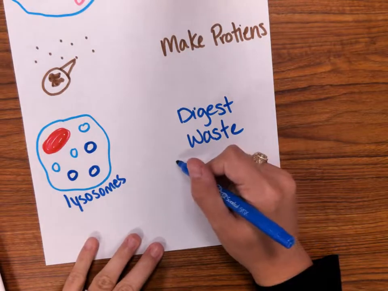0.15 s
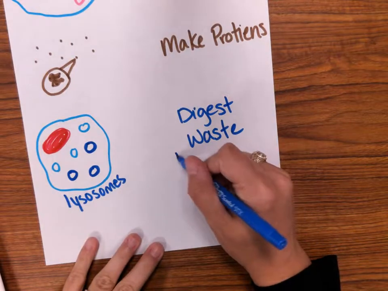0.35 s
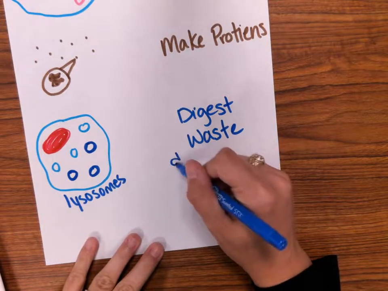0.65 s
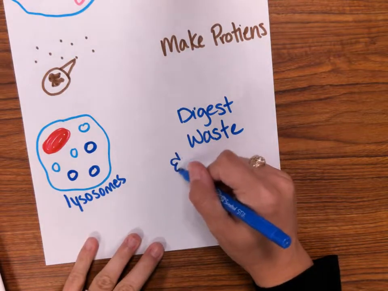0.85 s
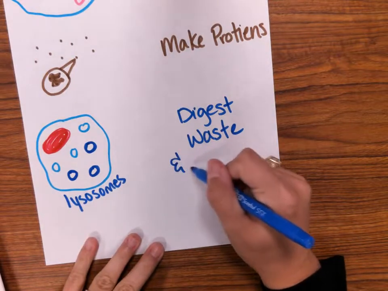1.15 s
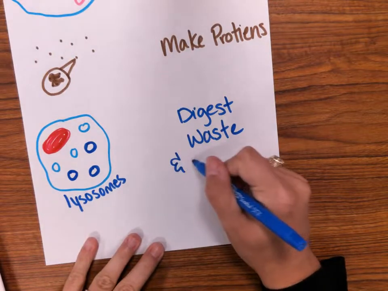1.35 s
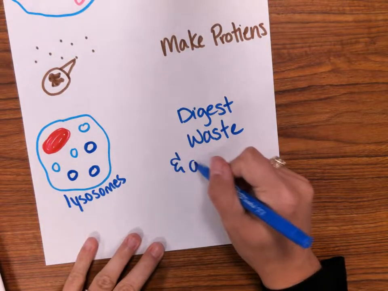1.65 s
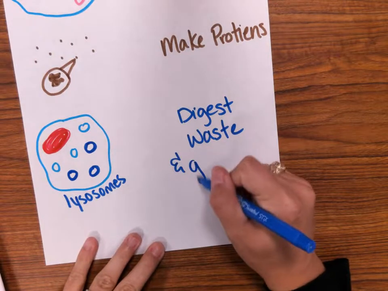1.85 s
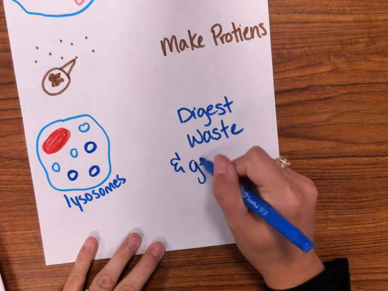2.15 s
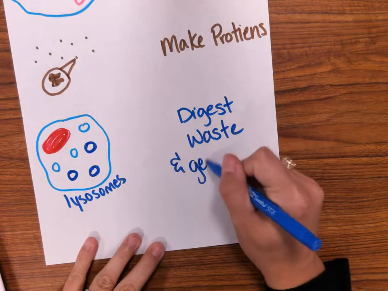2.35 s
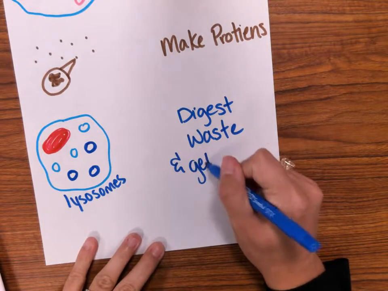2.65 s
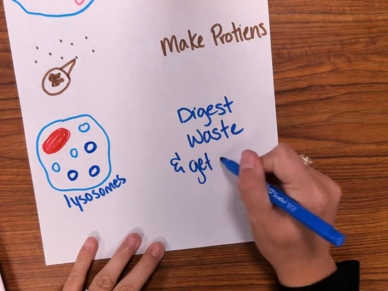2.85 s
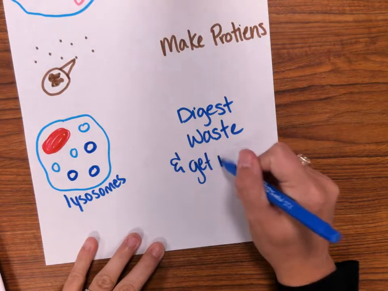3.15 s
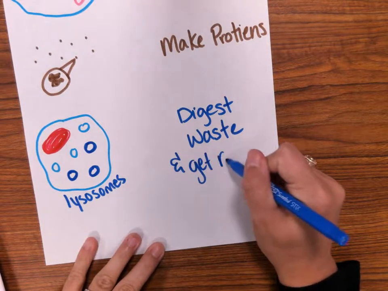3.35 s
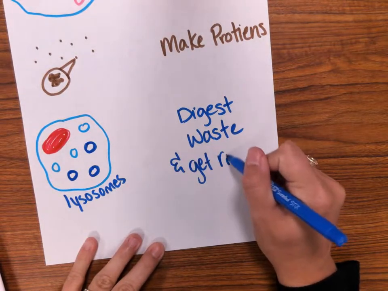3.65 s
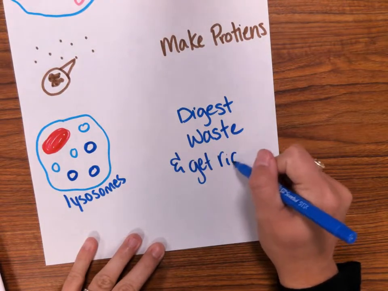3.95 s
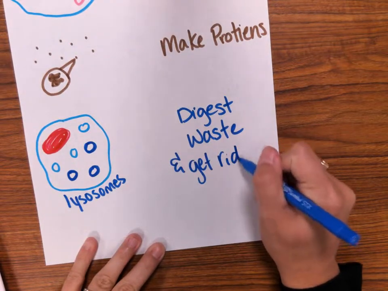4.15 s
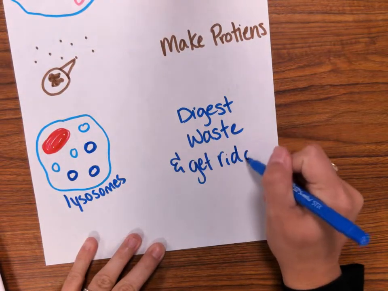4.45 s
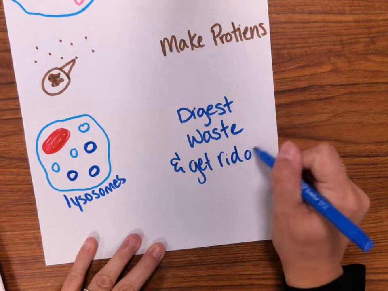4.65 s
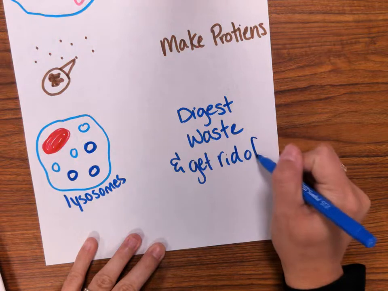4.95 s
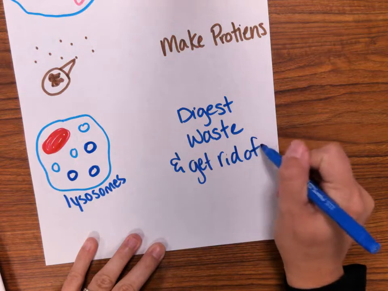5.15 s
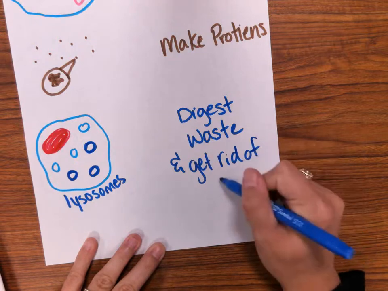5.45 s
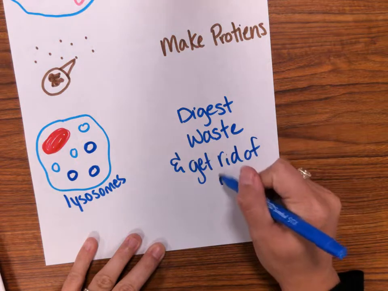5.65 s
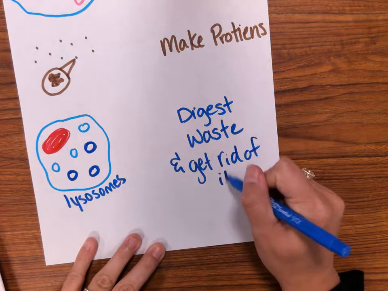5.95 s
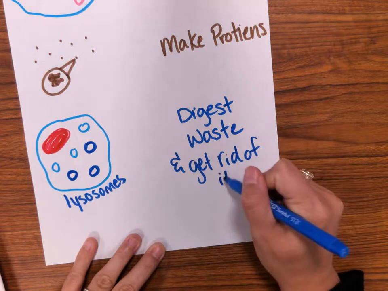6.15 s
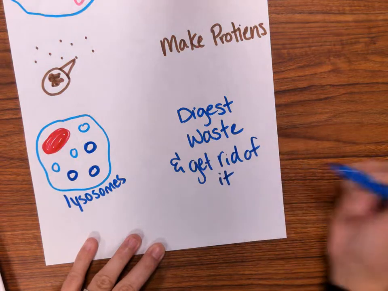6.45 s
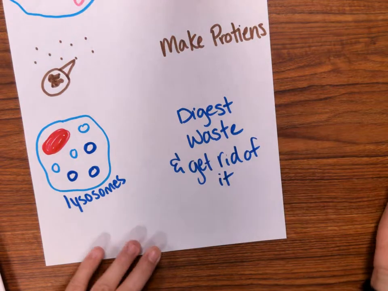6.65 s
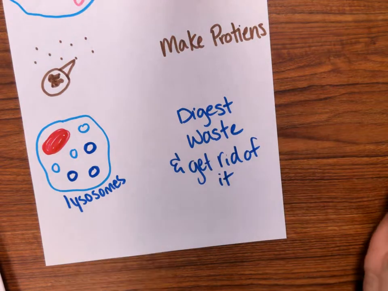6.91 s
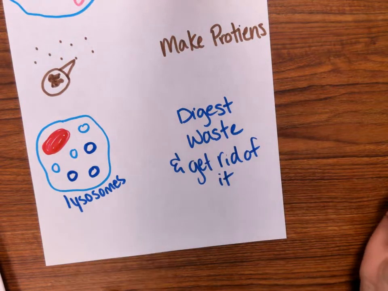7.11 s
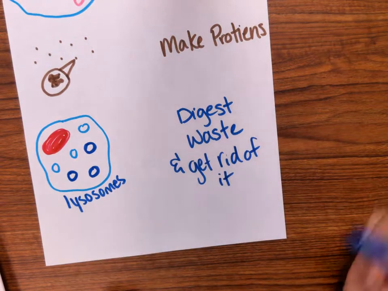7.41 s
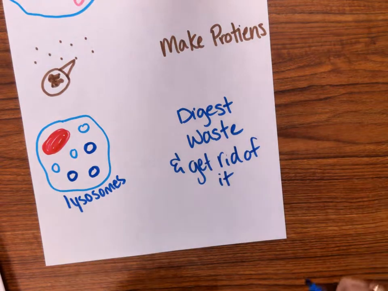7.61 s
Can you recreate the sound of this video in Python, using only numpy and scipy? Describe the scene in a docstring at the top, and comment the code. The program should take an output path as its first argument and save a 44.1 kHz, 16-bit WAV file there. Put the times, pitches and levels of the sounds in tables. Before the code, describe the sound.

A felt-tip marker writes short, squeaky-dry strokes on paper over low ventilation rumble, then one hard knock on the wooden table and plastic clicks.

```python
"""A close microphone at a wooden table, over low ventilation rumble, hum and a faint even hiss.
A felt-tip marker writes a few words on a sheet of paper: fibre snaps hiss, ring the tip and rasp the sheet.
Plastic clicks, slides of the hand and soft thumps come among the strokes.
Near seven seconds the marker knocks once on the table, ringing its modes, and the limiter ducks briefly.
The hand slides on to the end, with a cluster of plastic clicks, the cap's among them; a small room answers."""
import sys
import numpy as np
from scipy import signal
from scipy.fft import rfft, irfft, next_fast_len
from scipy.io import wavfile
from scipy.ndimage import uniform_filter1d, map_coordinates

SR = 44100
rng = np.random.default_rng(int(sys.argv[2]) if len(sys.argv) > 2 else 0)


def file_out(sig):
    """Save sig as 16-bit WAV at sys.argv[1]."""
    # one column per channel
    cols = np.atleast_2d(sig).T
    # limit, then scale
    lim = np.clip(cols, -1, 1)
    pcm = np.round(lim * 32767).astype(np.int16)
    wavfile.write(sys.argv[1], SR, pcm)


N = 342877  # samples, about 7.8 s
EDGE_HZ = 7270  # upper edge of the recorder's band


def gain_of(db):
    """Decibels to amplitude."""
    return 10 ** (np.asarray(db) / 20)


def evened(x):
    """Scales to rms 1."""
    return x / np.sqrt(np.mean(x ** 2) + 1e-20)


def read(points, hz):
    """Reads a table along a log-frequency axis."""
    f, value = np.transpose(points)
    return np.interp(np.log(hz + 1), np.log(f + 1), value)


def add(mix, s, sound):
    """Adds a sound into the mix at time s."""
    part = mix[round(s * SR):][:len(sound)]
    part += sound[:len(part)]


def coloured(x, spectrum):
    """Gives x a spectrum inside the recorder's band, at rms 1."""
    size = next_fast_len(len(x))
    hz = np.fft.rfftfreq(size, 1 / SR)
    shaped = rfft(x, size) * gain_of(read(spectrum, hz)) * (hz < EDGE_HZ)
    return evened(irfft(shaped, size)[:len(x)])


def band(centre_hz, width_hz):
    """Noise around one pitch, half amplitude at width_hz either side, rms 1; centred on zero it is a slow drift."""
    size = next_fast_len(N)
    hz = np.fft.rfftfreq(size, 1 / SR)
    response = 1 / (1 + ((hz - centre_hz) / width_hz) ** 2)
    return evened(irfft(rfft(rng.standard_normal(size)) * response, size)[:N])


def background():
    """Ventilation rumble with a few humming bands, under a faint even hiss."""
    # ventilation rumble: (frequency [Hz], relative level per Hz [dB])
    rumble_spectrum = [(4, 2), (21, 8), (29, -3.5), (33, -7.5), (39, 0), (50, -9), (68, -9), (90, -17.5),
                       (140, -22), (178, -22.5), (230, -25.5), (300, -28.5), (350, -34), (410, -31),
                       (445, -34.5), (540, -36.5), (700, -51.5), (1500, -72.5)]
    # humming bands of the ventilation: (frequency [Hz], half-width at half amplitude [Hz], rms level [dB])
    hum_bands = [(55.84, 4.5, -38), (105.9, 7.6, -46), (145.8, 2.7, -50), (164.5, 9.5, -52.5),
                 (194.4, 1.6, -54.5), (259.7, 4.6, -59.5), (255.7, 2.1, -62), (455.5, 6, -67.5),
                 (486, 5, -71)]
    # even hiss of the room: (frequency [Hz], relative level per Hz [dB])
    hiss_spectrum = [(290, -41), (500, -9.5), (676, -3), (731, -5.5), (883, -8.5), (955, -7.5),
                     (1260, -11.5), (1410, -14.5), (3990, -16.5), (5700, -14.5), (7200, -14)]
    rumble_db, hiss_db = -26.5, -58  # rms
    rumble = gain_of(rumble_db) * coloured(rng.standard_normal(N), rumble_spectrum)
    hum = sum(gain_of(db) * band(hz, width) for hz, width, db in hum_bands)
    hiss = gain_of(hiss_db) * coloured(rng.standard_normal(N), hiss_spectrum)
    return rumble + hum + hiss


def fibres(per_s, spread_db):
    """Tiny snaps of paper fibres at random moments, of uneven size unless spread_db is 0, at rms 1."""
    size = gain_of(spread_db * np.minimum(rng.exponential(1, N), 4))
    sign = rng.choice([-1, 1], N)
    return evened(size * sign * (rng.random(N) < per_s / SR))


def resonant(x, modes):
    """Passes x through parallel resonances with a soft top end, at rms 1."""
    hz = np.fft.rfftfreq(N, 1 / SR)
    response = sum(gain_of(db) / (1 + 2j * (hz - centre) / width) for centre, width, db in modes)
    soft_top = 1 / (1 + (hz / 4500) ** 8)
    return evened(irfft(rfft(x) * response * soft_top, N))


def bent(x, ratio):
    """Shifts every resonance in x by a ratio that may change over time."""
    return map_coordinates(x, [np.cumsum(ratio) % (len(x) - 1)], order=3)


def patchy(x, depth_db=2., span_hz=400., span_s=.04):
    """The colour of a noise shifts a little at random, in patches of frequency and time."""
    window, hop = 1024, 256  # samples
    z = signal.stft(x, SR, nperseg=window, noverlap=window - hop)[2]
    bins, frames = round(span_hz * window / SR), round(span_s * SR / hop)
    patches = uniform_filter1d(rng.standard_normal(z.shape), bins, 0)
    patches = evened(uniform_filter1d(patches, frames, 1))
    varied = signal.istft(z * gain_of(depth_db * patches), SR, nperseg=window, noverlap=window - hop)[1]
    return evened(varied[:N])


def sheet(snaps):
    """A dry rasp, plus the sheet's resonances, which drift and trade strength as the contact travels over it."""
    # resonances of the sheet lying on the table: (frequency [Hz], width [Hz], relative level [dB])
    sheet_modes = [(700, 89, -8), (867, 74, 1), (1100, 230, -3.5), (1277, 33, 5), (1533, 30, 6.5),
                   (1929, 33, 10), (2275, 56, 7), (2550, 170, 0), (3100, 70, 0.5), (3500, 600, -6),
                   (4100, 6500, -10)]
    # rasp that leaves the paper directly, without ringing: (frequency [Hz], relative level per Hz [dB])
    plain_spectrum = [(300, -8), (700, 3.5), (1200, -3.5), (2500, -1.5), (4000, -6.5), (5500, -21)]
    plain_db = -14.5  # relative to the ringing
    wander, wander_hz = .025, 4  # rms share of the pitch, and how fast it drifts
    pitch_ratio = 1 + wander * band(0, wander_hz)
    ringing = patchy(bent(resonant(snaps, sheet_modes), pitch_ratio))
    return evened(ringing + gain_of(plain_db) * coloured(snaps, plain_spectrum))


def grip(chatter_db, chatter_hz):
    """A rubbing contact catches and slips: a quick random gain."""
    return evened(gain_of(chatter_db * band(0, chatter_hz)))


def movement(start, length, swell_db, attack_s, release_s):
    """Samples and amplitude of one movement: it eases in, holds while the pressure swells or sags, and eases out."""
    margin_s = .12  # room for the soft edges
    first = max(round((start - margin_s) * SR), 0)
    last = min(round((start + length + margin_s) * SR), N)
    at = np.arange(first, last)
    t = at / SR - start
    rise = (1 + np.tanh(t / (2 * attack_s))) / 2
    fall = (1 + np.tanh((length - t) / (2 * release_s))) / 2
    swell = gain_of(swell_db * (np.clip(t / length, 0, 1) - .5))
    return at, rise * fall * swell


def nib(fizz_trim_db=-2.0, ring_trim_db=-2.5, rasp_trim_db=-54.0):
    """The felt tip plucks paper fibres: a fine hiss, the ring of the tip, a rasp from the sheet, at times a scrape."""
    # pen strokes; the direction of travel sets how much and how high the tip rings:
    # (start [s], length [s], hiss before trim [dB], ring relative to hiss before trims [dB],
    #  swell from start to end [dB], ring pitch [Hz], extra rasp of the sheet [dB])
    strokes = [ (0.401, 0.077, -63, 11, -5, 5420, 3), (0.534, 0.062, -52, -0.5, 0, 5170, 2.5),
               (0.598, 0.086, -49.5, -1, -3, 5330, 2), (0.689, 0.058, -52.5, 1.5, 10.5, 5480, 2.5),
               (0.818, 0.062, -48.5, -1.5, -12.5, 5520, 1.5), (0.904, 0.055, -45.5, -4, 10, 5120, 2),
               (1.012, 0.034, -53.5, 7.5, -2, 5850, 5), (1.465, 0.12, -51, -0.5, -11.5, 5350, 2.5),
               (1.59, 0.082, -45, 0.5, -3, 5350, 2), (1.712, 0.097, -49, 0, 1, 5210, 1),
               (1.826, 0.11, -46, -4, 0.5, 5050, 3.5), (2.156, .09, -50.5, -2.5, -9.5, 5220, 3.5),
               (2.283, 0.078, -51, 5, -4.5, 5700, 1), (2.387, 0.015, -42.5, -2, -9, 5300, 0),
               (2.538, 0.091, -51, 3.5, -7, 5290, 2.5), (2.772, 0.18, -54, -4, -0.5, 4950, 0.5),
               (3.082, 0.083, -56.5, 2.5, -15, 5050, 2.5), (3.205, 0.077, -47, -0.5, -4, 4960, 2),
               (3.499, 0.067, -57, 0.5, -13, 4930, 4.5), (3.88, 0.021, -47.5, -4, 1, 5100, 4.5),
               (3.925, 0.068, -48.5, 3.5, -7, 5110, 2), (4.02, 0.069, -46.5, 1.5, -8, 4950, 2),
               (4.118, 0.013, -47, -4, -21, 5050, 4.5), (4.179, 0.15, -56, 2.5, -20, 4880, 5),
               (4.419, 0.091, -54.5, 4, 2, 5130, 3.5), (4.54, 0.11, -51, -3.5, -19, 4890, 3.5),
               (4.803, 0.059, -49, -5, 3, 5340, -0.5), (4.883, 0.11, -52.5, 5, -10, 4880, 3.5),
               (5.145, 0.033, -41, -1.5, 4.5, 5040, 0.5), (5.587, 0.037, -51, 2, -16, 5260, 3),
               (5.979, 0.076, -46.5, -2.5, -7, 5070, 1.5), (6.25, 0.034, -38, -4.5, 5, 5150, 1.5), ]
    # the tip also scrapes during some strokes, dragging harder: (start [s], length [s], level [dB], pitch [Hz])
    scrapes = [(0.913, 0.036, -57, 3400), (4.902, 0.062, -53, 3210), (5.144, 0.04, -49.5, 3040),
               (6.248, 0.028, -51.5, 3150)]
    # fine hiss of the paper fibres under the tip: (frequency [Hz], relative level per Hz [dB])
    fizz_spectrum = [(4000, -39), (5300, -10.5), (5800, -5), (6400, 0.5), (7200, 4)]
    # ring of the tip: (frequency [Hz], relative level per Hz [dB])
    ring_spectrum = [(3000, -46), (3900, -23), (4250, -5.5), (4600, -7), (5050, -0.5), (5500, -4),
                     (6000, -7), (7200, -29.5)]
    ring_hz = 5050  # pitch of that ring before a stroke bends it
    attack_s, release_s = 0.0077, 0.0071  # the tip gets up to speed, then slows and lifts
    # the sheet's rasp gains this many dB per dB of the tip's sound, counted from this level before trims
    rasp_growth, rasp_ref_db = 0.53, -38.5
    scrape_width_hz = 480

    fizz = gain_of(fizz_trim_db) * coloured(fibres(per_s=4500, spread_db=0.0), fizz_spectrum)
    ring = gain_of(ring_trim_db) * coloured(fibres(per_s=7000, spread_db=-3.5), ring_spectrum)
    rasp = gain_of(rasp_trim_db) * sheet(fibres(per_s=3000, spread_db=-1.0))
    out = np.zeros(N)
    for start, length, db, tip_db, swell_db, hz, sheet_db in strokes:
        at, shape = movement(start, length, swell_db, attack_s, release_s)
        hissing = gain_of(db) * shape
        ringing = gain_of(db + tip_db) * shape
        tip_level = np.hypot(hissing, ringing) / gain_of(rasp_ref_db)
        rasping = gain_of(sheet_db) * tip_level ** rasp_growth
        pitched_ring = bent(ring[at], np.full(len(at), hz / ring_hz))
        out[at] += hissing * fizz[at] + ringing * pitched_ring + rasping * rasp[at]
    for start, length, db, hz in scrapes:
        at, shape = movement(start, length, 0, attack_s, release_s)
        out[at] += gain_of(db) * shape * band(hz, scrape_width_hz)[at]
    return out * grip(chatter_db=0.15, chatter_hz=80)


def taps(rows, rise_s):
    """Small blows: sines that swell for rise_s and then die away quickly."""
    t, out = np.arange(SR // 20) / SR, np.zeros(N)
    for s, db, hz in rows:
        envelope = t / rise_s * np.exp(1 - t / rise_s)
        add(out, s, gain_of(db) * envelope * np.sin(2 * np.pi * hz * t))
    return out


def clicks():
    """Hard plastic parts meet, and a couple of brief rubs: bright sines with a very short swell."""
    # clicks of nib, barrel and cap, and two brief rubs near 7.2 and 7.3 s: (time [s], envelope peak [dB], pitch
    # [Hz])
    click_rows = [(.8149, -32, 5900), (2.5417, -35, 5230), (3.1977, -44, 6500), (3.218, -36, 6800),
                  (4.0323, -31, 6750), (5.1483, -39, 6500), (5.15, -36, 5700), (5.591, -40, 2000),
                  (5.9799, -37, 6800), (6.261, -33, 6700), (6.6215, -33, 6600), (7.206, -41, 1590),
                  (7.293, -37, 2550), (7.4434, -26.5, 2860), (7.4441, -17.5, 5350), (7.4457, -16, 6440),
                  (7.4525, -36, 6000), (7.5195, -41, 2220)]
    return taps(click_rows, rise_s=0.00024)


def hand(hiss_trim_db=0.5, rasp_trim_db=0.0):
    """The side of the hand brushes over paper and wood, its snaps denser than the nib's."""
    # slides of the hand: (start [s], length [s], hiss before trim [dB],
    #  rasp of the sheet relative to hiss before trims [dB], swell from start to end [dB])
    slides = [ (1.167, 0.17, -58, -1, -6.5), (1.33, 0.2, -60, -2.5, 17.5), (3.786, 0.046, -57.5, 1.5, 0),
              (4.713, 0.052, -57, -4, 0.5), (5.278, 0.13, -50.5, -2, -4), (6.399, 0.31, -47.5, -4.5, 0.5),
              (6.898, 0.1, -58, -2.5, -6), (7.066, 0.071, -57, -1.5, 0), (7.2, 0.27, -64, 3, -2),
              (7.45, 0.19, -49.5, -6, 1), (7.499, 0.023, -55, 16, 7), (7.667, 0.12, -52, 2.5, 1), ]
    # friction of the skin: (frequency [Hz], relative level per Hz [dB])
    skin_spectrum = [(2500, -29), (3800, -13.5), (4500, -8), (5500, -4.5), (6500, 0.5), (7200, 0.5)]
    attack_s, release_s = 0.026, 0.013  # the heavier hand starts and stops more slowly
    snaps = fibres(per_s=17000, spread_db=-9.0)
    hiss = gain_of(hiss_trim_db) * coloured(snaps, skin_spectrum)
    rasp = gain_of(rasp_trim_db) * sheet(snaps)
    out = np.zeros(N)
    for start, length, db, sheet_db, swell_db in slides:
        at, shape = movement(start, length, swell_db, attack_s, release_s)
        out[at] += gain_of(db) * shape * (hiss[at] + gain_of(sheet_db) * rasp[at])
    return out * grip(chatter_db=0.86, chatter_hz=58.7)


def thumps():
    """Hand and pen land softly on the table: low sines with a slower swell."""
    # soft thumps of hand and pen: (time [s], envelope peak [dB], pitch [Hz])
    thump_rows = [(1.885, -45, 840), (5.556, -37, 410), (7.372, -47, 930)]
    return taps(thump_rows, rise_s=0.0028)


def knock():
    """A hard blow cracks and rings the table; slow bending modes start later; weak modes thud, then linger."""
    # knock of the marker on the table top: (time [s], level of the whole blow [dB])
    blows = [(6.9955, -7.5)]
    # modes of the table with the marker on it: (frequency [Hz], level within the blow [dB], t60 [s])
    table_modes = [(60, 3, 0.11), (120.5, -4, 0.13), (185, -13, 0.073), (400, -20, 0.06), (463, -4, 0.05),
                   (708, -25.5, 0.14), (856, -9, 0.066), (945, 10, 0.013), (1087, -13, 0.058),
                   (1248, -14.5, 0.065), (1355, -26, .06), (1550, -24, 0.066), (1655, -14.5, 0.04),
                   (1953, -12, 0.06), (2090, -5, 0.026), (2270, -24, 0.066), (2580, -8.5, 0.018),
                   (3200, -12, 0.011), (4000, -15.5, 0.015), (4900, -33, 0.025), (6300, -30, .02),
                   (6780, -25.5, 0.034)]
    # dense wooden decay after the blow: (frequency [Hz], relative level per Hz [dB])
    wood_spectrum = [(300, 8), (560, 2), (680, 10), (900, 11.5), (1380, 13), (1550, 6), (1720, -2),
                     (1900, 4), (2350, 3), (2650, -28), (7000, -42.5)]
    contact_s, bend_s, lag_s = 0.00051, 0.0011, 0.0044  # rise of the modes, rise and delay of the bending ones
    # levels within the blow, and the times to fall by 60 dB
    crack_db, crack_t60 = -16.0, 0.033
    thud_db, thud_t60 = -16.5, 0.12
    wood_db, wood_t60 = -30.0, 0.48

    t, out = np.arange(SR // 2) / SR, np.zeros(N)
    crack = gain_of(crack_db - 60 * t / crack_t60) * band(1800, 1800)[:len(t)]
    decay = gain_of(thud_db - 60 * t / thud_t60) + gain_of(wood_db - 60 * t / wood_t60)
    ring = decay * coloured(rng.standard_normal(N), wood_spectrum)[:len(t)]
    for hz, db, t60 in table_modes:
        if hz < 300:  # bending modes
            age, rise_s = np.maximum(t - lag_s, 0), bend_s
        else:
            age, rise_s = t, contact_s
        envelope = gain_of(db - 60 * age / t60) * (1 - np.exp(-age / rise_s))
        ring = ring - envelope * np.sin(2 * np.pi * hz * age)
    for s, db in blows:
        add(out, s, gain_of(db) * (crack + ring))
    return out


def room(x):
    """A small room's diffuse tail, each band dying at its own speed; the bass stays close and dry."""
    # reverberation of the room: (frequency [Hz], t60 [s])
    echo_times = [(200, 0.23), (1200, 0.071), (2500, 0.022), (7000, 0.19)]
    gap_s, low_hz = .006, 350  # silence ahead of the echoes, and their low edge
    echoes = rng.standard_normal(SR // 2) * (np.arange(SR // 2) / SR > gap_s)
    echoes = signal.sosfilt(signal.butter(2, low_hz, "high", fs=SR, output="sos"), echoes)
    hz, t, z = signal.stft(echoes, SR, nperseg=256)
    dying = gain_of(-60 * t / read(echo_times, hz)[:, None])
    tail = signal.istft(z * dying, SR, nperseg=256)[1]
    return signal.fftconvolve(x, tail / np.linalg.norm(tail))[:N]


def scene(room_db=-4.5, knock_room_db=-28.5):
    """All sources close to the microphone, with a little room; the knock comes mostly through the table, drier."""
    near = nib() + clicks() + hand() + thumps()
    blow = knock()
    echoes = room(gain_of(room_db) * near + gain_of(knock_room_db) * blow)
    return (background() + near + blow + echoes)[None]


def record(dry, limit_db=-2.5, recover_db_per_s=42.0):
    """A peak limiter with a quick grip and slower recovery, a hard ceiling on the peaks, then the band limit."""
    ceiling = .72  # amplitude ahead of the band limit
    peak_db = 20 * np.log10(abs(dry[0]) + 1e-9)
    # each peak is held, then falls at a steady rate
    fall = np.arange(N) * recover_db_per_s / SR
    held_db = np.maximum.accumulate(peak_db + fall) - fall
    over_db = np.maximum(held_db - limit_db, 0)
    duck_db = uniform_filter1d(over_db, size=60)
    limited = np.clip(dry / gain_of(duck_db), -ceiling, ceiling)
    band_limit = signal.firwin(1023, EDGE_HZ, window=("kaiser", 8), fs=SR)
    return signal.oaconvolve(limited, band_limit[None], "same")


dry = scene()
out = record(dry)
file_out(out)
```